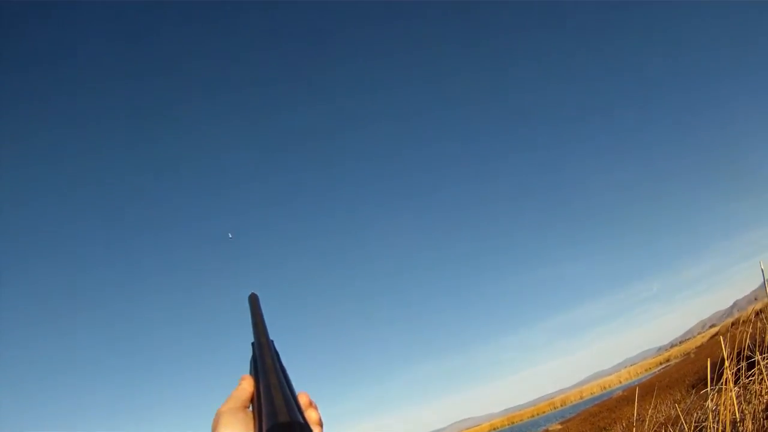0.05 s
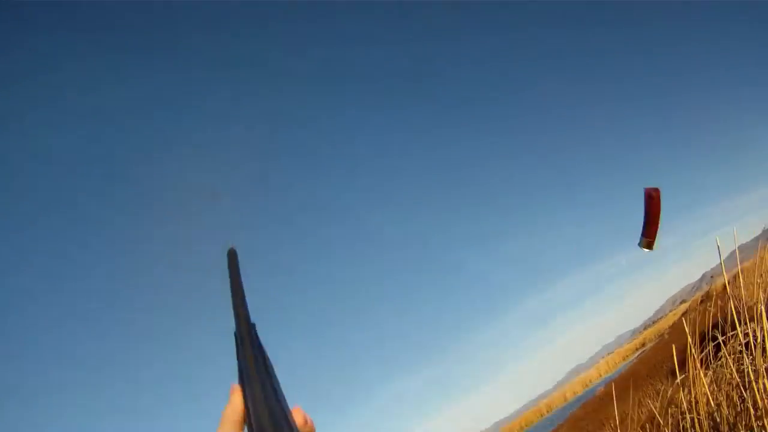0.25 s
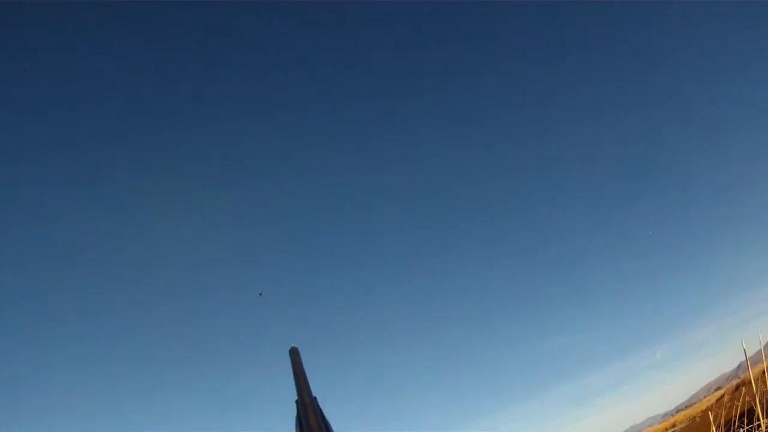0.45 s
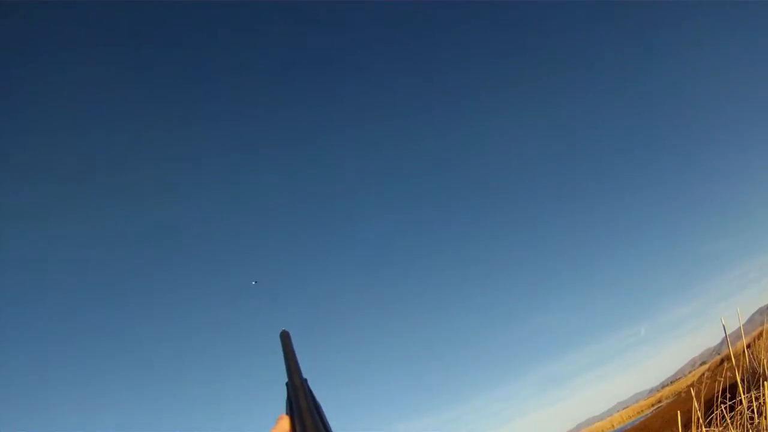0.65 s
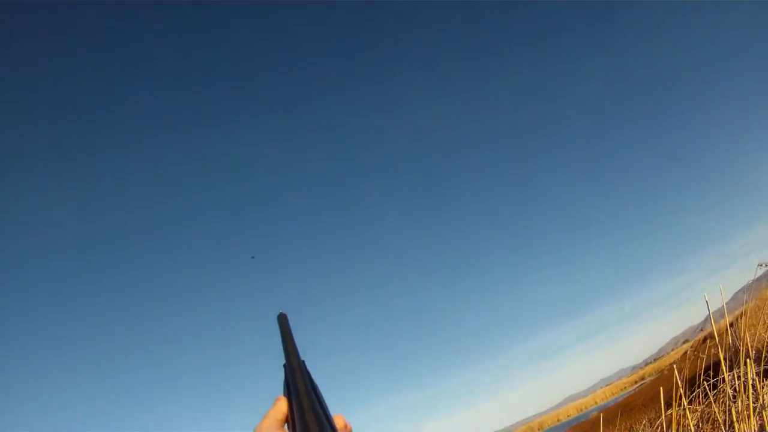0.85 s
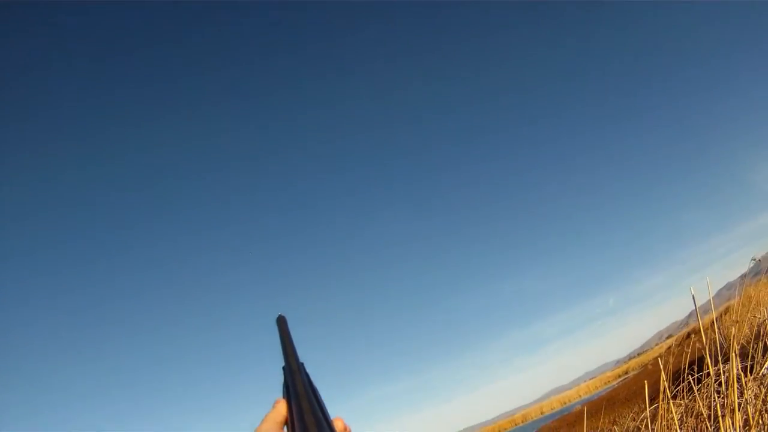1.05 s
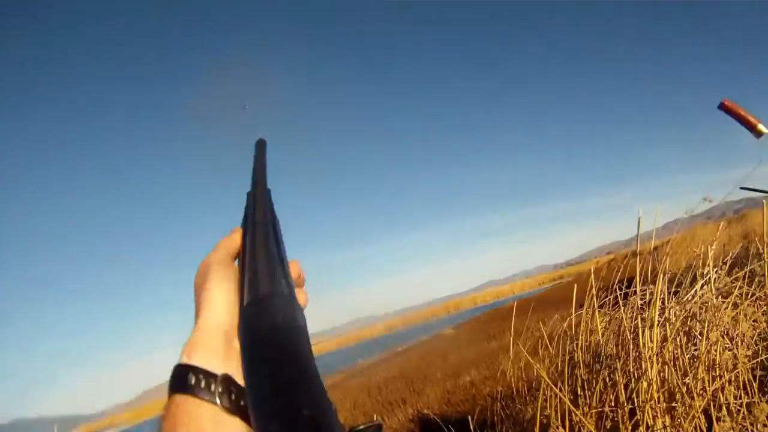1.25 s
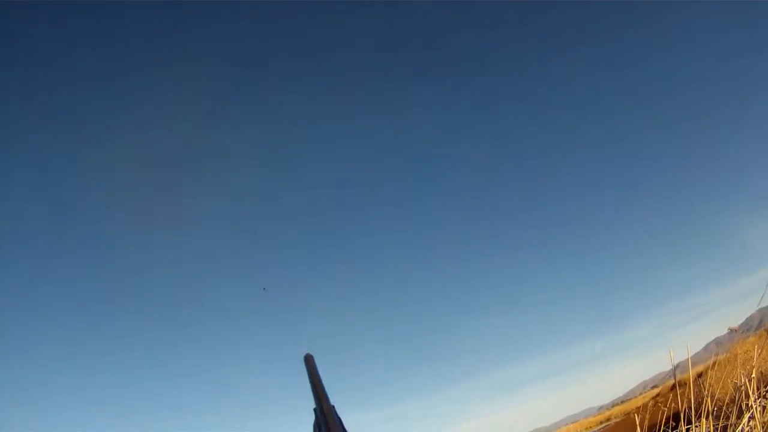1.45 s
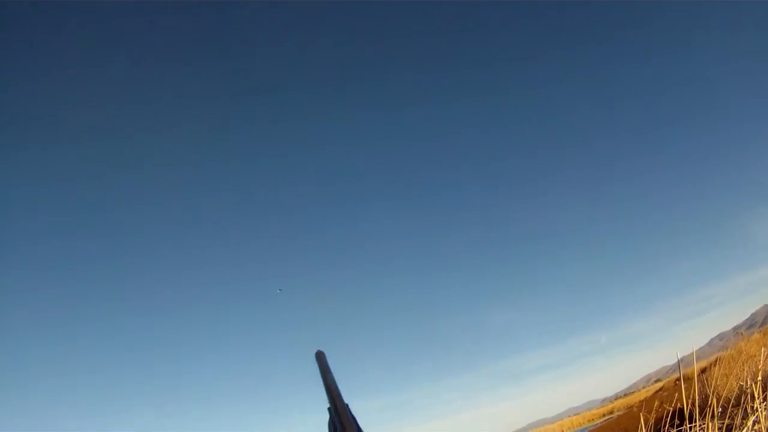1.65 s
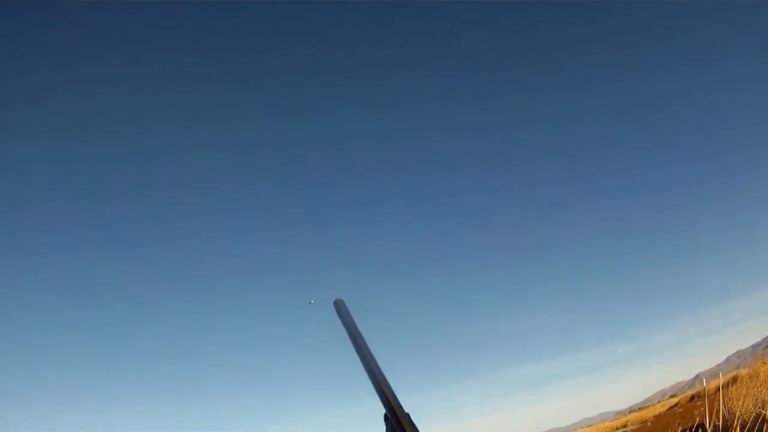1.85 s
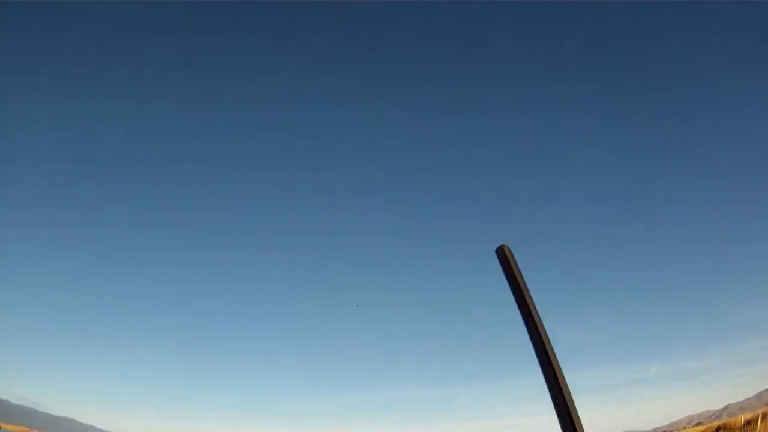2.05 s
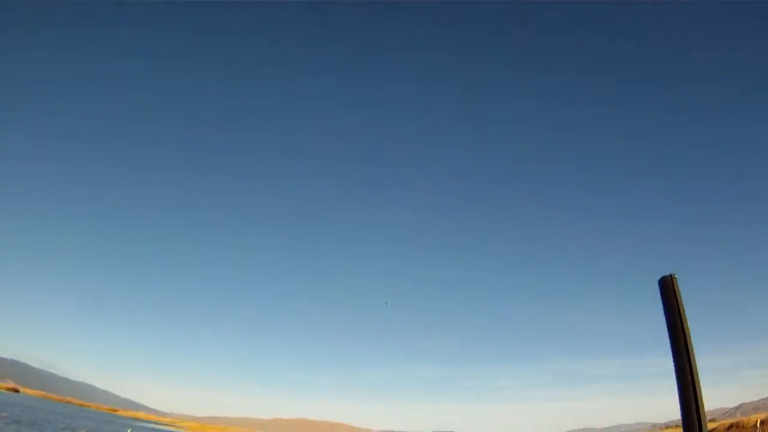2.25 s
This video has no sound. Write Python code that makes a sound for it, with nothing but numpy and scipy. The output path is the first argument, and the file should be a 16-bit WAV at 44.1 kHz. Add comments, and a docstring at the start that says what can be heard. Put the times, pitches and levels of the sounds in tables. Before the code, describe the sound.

Two loud, close shotgun blasts crack across an open marsh, each followed by a mechanical clatter, a low recoil bump and faint echo. Clothes rustle softly and the lowered gun gives one small knock, all heard from a body-worn microphone.

```python
"""Two shots from a self-loading shotgun in an open marsh, heard by a cased camera worn by the shooter.
Each blast rings the case and overloads the microphone; the action clatters, recoil rocks the mount
and the marsh returns a faint echo. The gun knocks once as it is lowered.
Clothes and reeds rustle as it swings, over faint hiss and low wind."""
import sys
import numpy as np
from scipy import signal
from scipy.fft import rfft, irfft
from scipy.io import wavfile

SR = 44100
rng = np.random.default_rng(int(sys.argv[2]) if len(sys.argv) > 2 else 0)


def master_out(mix):
    """Clip the mix to full scale and print it as 16-bit PCM to the path in sys.argv[1]."""
    frames = np.transpose(np.atleast_2d(mix))
    ceiling = np.clip(frames, -1, 1)
    pcm = np.round(ceiling * 32767).astype(np.int16)
    wavfile.write(sys.argv[1], SR, pcm)


N = 105840
FFT_SIZE = 131072
T, FREQ = np.arange(N) / SR, np.arange(FFT_SIZE // 2 + 1) * SR / FFT_SIZE


def amp(db):
    """dB to gain."""
    return 10 ** (np.asarray(db) / 20)


def curve(points):
    """Gain per bin from (freq_hz, gain_db) points, interpolated in log frequency."""
    hz, db = np.array(points).T
    return amp(np.interp(np.log(FREQ + 1), np.log(hz), db))


def filtered(x, gain):
    """Minimum-phase filter with the given gain per bin."""
    cepstrum = irfft(np.log(gain + 1e-7))
    cepstrum[1:FFT_SIZE // 2] *= 2
    cepstrum[FFT_SIZE // 2 + 1:] = 0
    return irfft(rfft(x, FFT_SIZE) * np.exp(rfft(cepstrum)))[:N]


def noise(gain):
    """Coloured noise, rms 1."""
    x = irfft(rfft(rng.standard_normal(FFT_SIZE)) * gain)[:N]
    return x / np.std(x)


def drift(rate_hz):
    """Smooth random control signal, rms 1."""
    return noise(np.exp(-(FREQ / rate_hz) ** 2) * (FREQ > 0))


def burst(start_s, hold_s, fall_s, rise_s=.00013):
    """Linear attack; exponential decay from start_s + hold_s."""
    attack = np.clip((T - start_s) / rise_s, 0, 1)
    return attack * np.exp(-np.maximum(T - start_s - hold_s, 0) / fall_s)


# Shots: start_s, blast_db, boom_start_hz, ring_hz, ring_db, roar_db, echo_db
SHOTS = [(0.2188, 4, 420, 1965, 2, -9, -55.5), (1.2261, 3, 520, 2332, 1.5, -26, -57.5)]
# Crack spectrum: freq_hz, gain_db
CRACK_SPECTRUM = [(150, -26), (450, -16), (900, -7), (1600, 0), (3000, 1), (9000, 0)]
# Roar spectrum: freq_hz, gain_db
ROAR_SPECTRUM = [(30, -7.5), (120, -1), (250, -1), (500, 2), (1000, 0.5), (1500, -14.5), (3000, -20.5),
                 (9000, -33.5)]


def blasts(colour):
    """The gun's own crack, then the muzzle blast: crack, thud, roar and a boom that rings the case."""
    lead_s, glide_hz_per_s, thud_hz, upper_mode_hz = .0032, 260000, 107, 3691
    crack_noise = noise(colour ** .77 * curve(CRACK_SPECTRUM))
    roar_noise = noise(curve(ROAR_SPECTRUM))
    waver_rad = .78 * drift(550)  # phase jitter of the overloaded ring
    out = 0
    for start_s, blast_db, boom_hz, ring_hz, ring_db, roar_db, _ in SHOTS:
        muzzle_s = start_s + lead_s
        age_s = T - muzzle_s
        rad_per_hz = 2 * np.pi * age_s
        lead = amp(-16) * crack_noise * burst(start_s, lead_s, .0014, rise_s=.001)
        crack = amp(-8.5) * crack_noise * burst(muzzle_s, .0055, .0014)
        boom_rad = (boom_hz + glide_hz_per_s * age_s / 2) * rad_per_hz
        boom = amp(-.5) * np.sin(boom_rad) * burst(muzzle_s, .0015, .0013, rise_s=.0015)
        thud = amp(-26) * np.sin(thud_hz * rad_per_hz) * burst(muzzle_s, .0055, .0041)
        roar = roar_noise * burst(muzzle_s, .002, .0026)
        ring = np.sin(ring_hz * rad_per_hz + waver_rad) * burst(muzzle_s + .0025, .003, .0011)
        upper = np.sin(upper_mode_hz * rad_per_hz - waver_rad) * burst(muzzle_s + .002, .0018, .0011)
        out += amp(blast_db) * (lead + crack + boom + thud) + amp(roar_db) * roar
        out += amp(ring_db) * (ring + amp(-6) * upper)
    return out


# Bolt, shell and stock contacts: start_s, level_db, decay_s, hardness_db
CLACKS = [(0.1669, -35.5, 0.0053, -3.5), (0.232, -29, .012, -1.5), (0.241, -42, 0.0063, -0.5),
          (0.264, -45, 0.02, -13), (0.3266, -25.5, 0.0072, -21), (0.337, -40.5, 0.028, -23),
          (0.3653, -26.5, 0.0036, 14), (0.374, -26.5, 0.0032, -13), (0.406, -41.5, 0.0033, -4),
          (0.496, -45, 0.0019, 12), (1.1149, -53, 0.0045, -5), (1.237, -31, 0.0071, 2.5),
          (1.243, -22, 0.0063, -8.5), (1.247, -40.5, 0.011, -6.5), (1.258, -46, 0.065, -2.5),
          (1.282, -43.5, 0.016, -12), (1.304, -50.5, 0.034, -13), (1.326, -46.5, 0.027, -15),
          (1.3387, -38.5, 0.015, -17), (1.362, -34, 0.009, -26), (1.370, -27, 0.0031, 14),
          (1.376, -46, .005, -12), (1.384, -35, 0.0017, -11), (1.4264, -60, 0.0027, 10.5),
          (1.4651, -50.5, .004, 5), (1.5726, -43, 0.0028, -3), (2.010, -50, 0.0023, -13),
          (2.053, -52, .006, -10), (2.1006, -56, .006, -2), (2.1288, -51, 0.0051, -3),
          (2.1958, -47.5, 0.0018, 0)]


def clacks(colour):
    """Gun contacts: hard ones carry treble, dull ones ring the case, long scrapes start softly."""
    crossover_hz = 3700
    treble = FREQ ** 4 / (FREQ ** 4 + crossover_hz ** 4)
    dull_tilt = curve([(300, 2.5), (600, -1.5), (1050, 4), (2000, 0), (3000, -5)])
    dull = noise(colour ** 1.3 * (1 - treble) * dull_tilt)
    bright = noise(colour * treble)
    out = 0
    for start_s, level_db, decay_s, hardness_db in CLACKS:
        contact = (dull + amp(hardness_db) * bright) / np.hypot(1, amp(hardness_db))
        out += amp(level_db) * burst(start_s, 0, decay_s, rise_s=.34 * decay_s) * contact
    return out


# Mount jolts: peak_s, level_db, pitch_hz, rise_s, decay_s
JOLTS = [(0.2412, -29, 60, 0.021, 0.0066), (0.2692, -27, 62.3, 0.0028, .012),
         (0.33, -23, 40.7, 0.011, 0.032), (0.377, -33.5, 63, 0.016, 0.0155),
         (0.425, -40.5, 26.96, 0.014, 0.093), (1.282, -30.5, 36, 0.03, 0.018),
         (1.3718, -11.5, 79, 0.0068, 0.0032), (1.3728, -17, 44.2, 0.014, 0.016),
         (1.396, -31, 56, 0.0045, .014)]
# Stock and mount rubs: start_s, level_db, decay_s
RUBS = [(0.266, -49, 0.034), (0.322, -46, 0.026), (1.232, -45, 0.016), (1.28, -51.5, 0.065),
        (1.362, -33, 0.011)]
# Rub spectrum: freq_hz, gain_db
RUB_SPECTRUM = [(40, -8.5), (110, -3), (200, 0.5), (300, -4.5), (450, -16), (1000, -35.5)]


def recoil():
    """The camera mount is shoved, rubs and sways to rest."""
    rubbing = sum(amp(db) * burst(start_s, 0, decay_s, rise_s=.0033) for start_s, db, decay_s in RUBS)
    out = rubbing * noise(curve(RUB_SPECTRUM))
    for peak_s, level_db, pitch_hz, rise_s, decay_s in JOLTS:
        age_s = T - peak_s
        attack = np.exp(-(np.minimum(age_s, 0) / rise_s) ** 2)
        decay = np.exp(.5 - np.hypot(.5, np.maximum(age_s, 0) / decay_s))
        out -= amp(level_db) * attack * decay * np.cos(2 * np.pi * pitch_hz * age_s)
    return out


# Knock modes: pitch_hz, level_db, decay_s
KNOCK_MODES = [(111, -11.5, .008), (205.2, -14.5, 0.0036), (862, -7, 0.0027), (1033, 1, 0.0022),
               (1487, 3, 0.0011), (1800, -2.5, 0.0012)]
# Path through the mount: freq_hz, gain_db
MOUNT_RESPONSE = [(230, 2), (400, -3), (600, -15.5), (760, -0.5), (2150, 2.5), (2800, -26), (6000, -33.5)]


def knock(start_s=2.0299, bounce_s=.0055):
    """The lowered gun gives a damped knock and a small bounce, carried through the mount."""
    body = 0
    for hit_s, hit_db in [(start_s, -22.5), (start_s + bounce_s, -42)]:
        age_s = np.maximum(T - hit_s, 0)
        for pitch_hz, level_db, decay_s in KNOCK_MODES:
            mode = np.exp(-age_s / decay_s) * np.sin(2 * np.pi * pitch_hz * age_s)
            body += amp(hit_db + level_db) * mode
    return filtered(body, curve(MOUNT_RESPONSE))


# Echo spectrum: freq_hz, gain_db
ECHO_SPECTRUM = [(40, -8), (150, -2), (300, -4.5), (700, 2.5), (1100, 1.5), (2000, -5.5), (3500, -6.5),
                 (9000, -10)]


def marsh_echo(colour, bank_delay_s=.19, flutter_db=3.2):
    """Each shot scatters back from near reeds, then a far bank, dull and uneven."""
    envelope = 0
    for start_s, *_, echo_db in SHOTS:
        reeds = burst(start_s, .094, .2, rise_s=.094)
        bank = amp(-2) * burst(start_s + bank_delay_s, .045, .16, rise_s=.045)
        envelope += amp(echo_db) * (reeds + bank)
    return envelope * noise(colour * curve(ECHO_SPECTRUM)) * amp(flutter_db * drift(25))


# Rustle envelope: time_s, level_db
RUSTLE_LEVELS = [(0, -43), (.025, -44), (.062, -49.5), (.118, -48.5), (.135, -55), (.19, -55), (.21, -51.5),
                 (.30, -51.5), (.40, -48), (0.521, -76.5), (.7, -67.5), (1.2, -75), (1.742, -72.5),
                 (1.80, -68.5), (1.895, -56), (1.93, -67), (2.02, -61), (2.13, -64), (2.18, -79.5),
                 (2.4, -75.5)]
# Rustle spectrum: freq_hz, gain_db
RUSTLE_SPECTRUM = [(40, -3), (170, 5), (300, 6.5), (700, -1.5), (1200, -1.5), (2000, -2), (5000, -2.5),
                   (14000, 0)]


def rustle(colour, flutter_db=2.5):
    """Sleeves and reeds brush as the shooter swings."""
    time_s, level_db = np.array(RUSTLE_LEVELS).T
    envelope = amp(np.interp(T, time_s, level_db) + flutter_db * drift(90))
    return envelope * noise(colour * curve(RUSTLE_SPECTRUM))


# Hiss spectrum: freq_hz, gain_db
HISS_SPECTRUM = [(30, 15), (100, 17), (250, 21.5), (600, 3.5), (1200, -2.5), (2000, -6), (3600, -6),
                 (7000, -5), (14000, -0.5)]
# Wind spectrum: freq_hz, gain_db
WIND_SPECTRUM = [(12, -10.5), (25, -1.5), (42, -2), (65, -9.5), (100, -19), (200, -23.5), (600, -62)]


def air(colour, gust_db=1.5):
    """Faint hiss and low wind buffeting on the case."""
    hiss = amp(-65) * noise(colour * curve(HISS_SPECTRUM))
    wind = amp(-59.5 + gust_db * drift(15)) * noise(curve(WIND_SPECTRUM))
    return hiss + wind


# Camera colour peaks: centre_hz, width_hz, gain_db
COLOUR_PEAKS = [(856, 500, -12), (1106, 180, -10.5), (2010, 220, 0.5), (2640, 660, -13), (3586, 280, -8),
                (5110, 270, -14.5), (7020, 300, -18.5), (8340, 300, -22), (9600, 280, -24.5),
                (14400, 840, -27.5)]


def camera_colour():
    """Gain per bin: case resonances up to 7 kHz, the camera's thin treble sheen peaks above."""
    power = sum(amp(db) ** 2 / (1 + ((FREQ ** 2 - centre_hz ** 2) / (width_hz * FREQ + 1)) ** 2)
                for centre_hz, width_hz, db in COLOUR_PEAKS)
    return np.sqrt(power)


def scene():
    """Mono sum at the microphone."""
    colour = camera_colour()
    gun = blasts(colour) + marsh_echo(colour) + clacks(colour) + recoil() + knock()
    return (gun + rustle(colour) + air(colour))[None]


# Camera treble notches: centre_hz, width_hz, gain_db
NOTCHES = [(6000, 380, -16), (12160, 1600, -21)]


def record(dry):
    """The microphone clips; the camera mirrors mids into a thin sheen, notches and cuts the treble."""
    mic_limit, camera_limit, mirror_hz, cutoff_hz = .6, .63, 12000, 15300
    x = np.clip(dry[0], -mic_limit, mic_limit)
    lowpassed = filtered(x, curve([(2200, 1), (3600, -1.5), (5500, -19.5), (9000, -37)]))
    mids = np.diff(lowpassed, prepend=0)
    sheen = (amp(1) * mids + amp(-30) * x) * np.cos(2 * np.pi * mirror_hz * T)
    x = np.clip(x + sheen, -camera_limit, camera_limit)
    notch_db = sum(db * np.exp(-(2 * (FREQ - hz) / width_hz) ** 2) for hz, width_hz, db in NOTCHES)
    x = np.clip(filtered(x, amp(notch_db)), -camera_limit, camera_limit)
    top_cut = signal.ellip(8, .2, 70, cutoff_hz, fs=SR, output="sos")
    return signal.sosfilt(top_cut, x)[None]


dry = scene()
out = record(dry)
master_out(out)
```